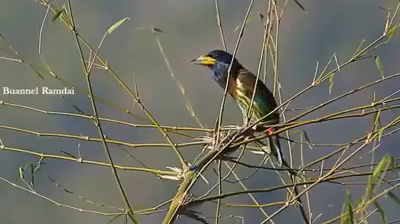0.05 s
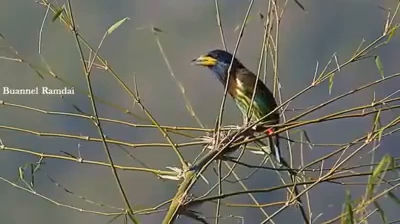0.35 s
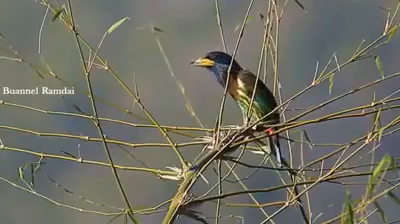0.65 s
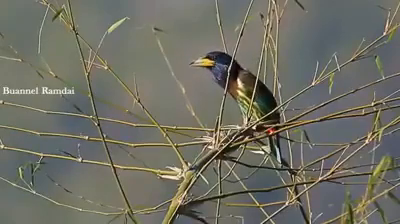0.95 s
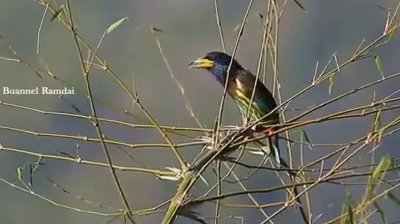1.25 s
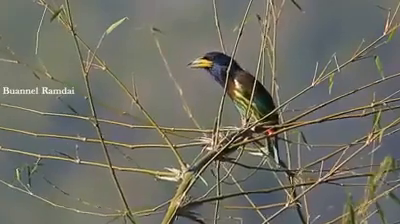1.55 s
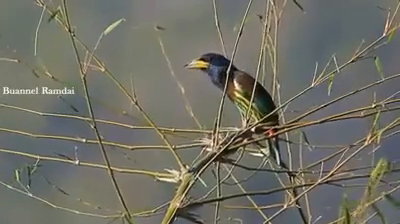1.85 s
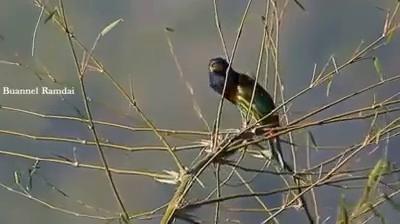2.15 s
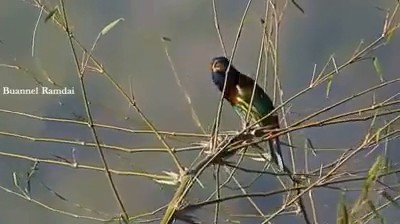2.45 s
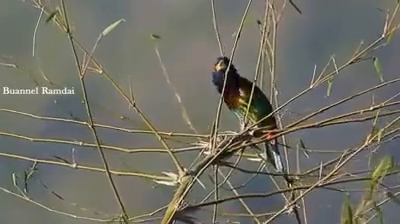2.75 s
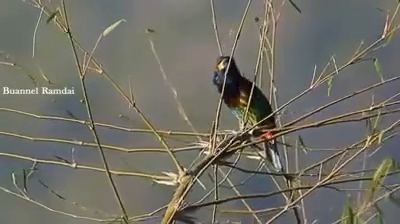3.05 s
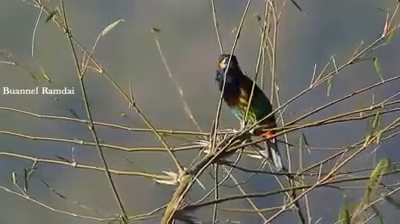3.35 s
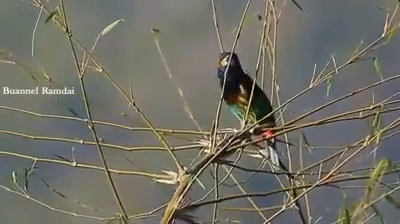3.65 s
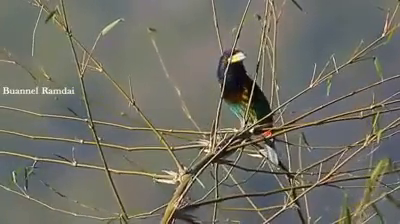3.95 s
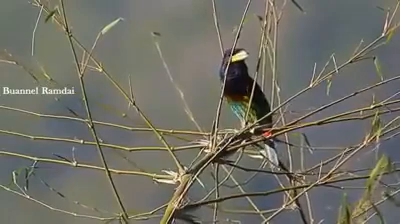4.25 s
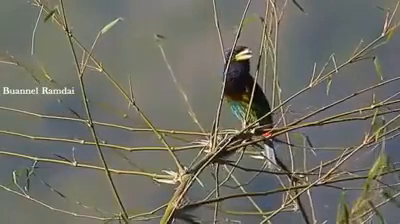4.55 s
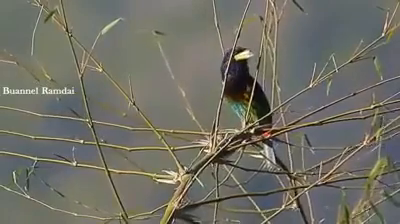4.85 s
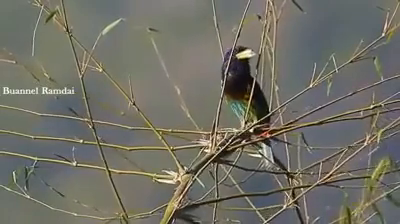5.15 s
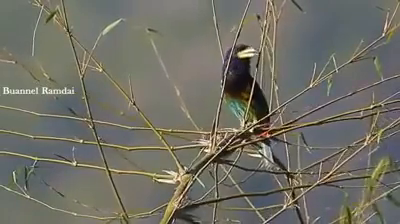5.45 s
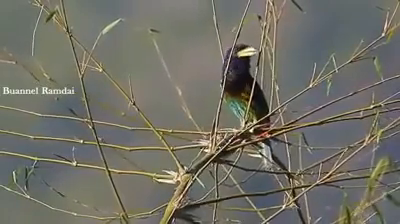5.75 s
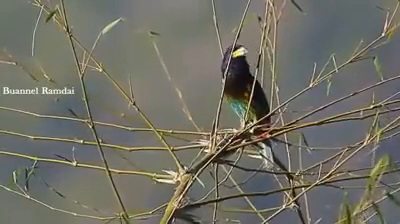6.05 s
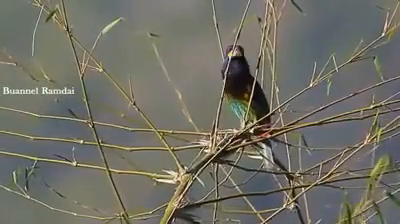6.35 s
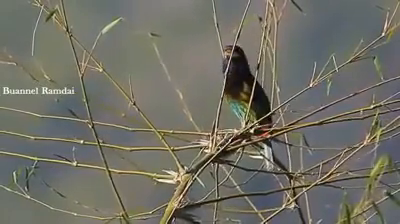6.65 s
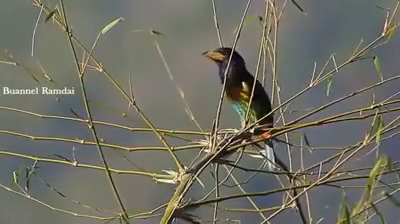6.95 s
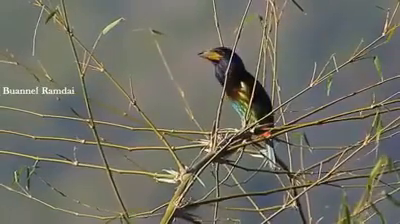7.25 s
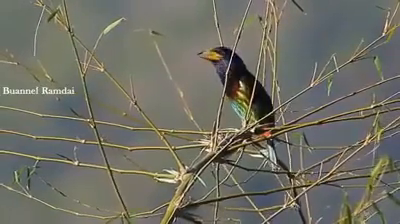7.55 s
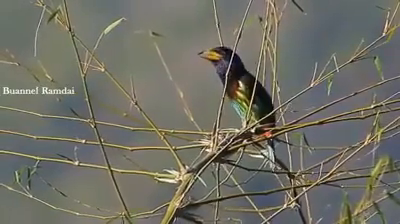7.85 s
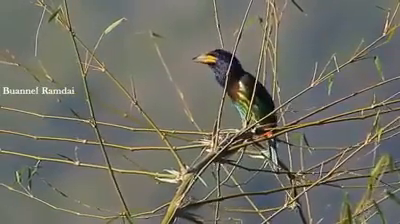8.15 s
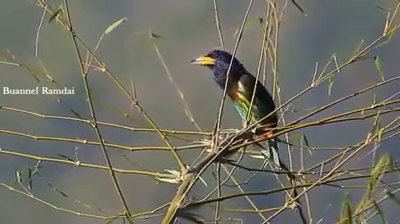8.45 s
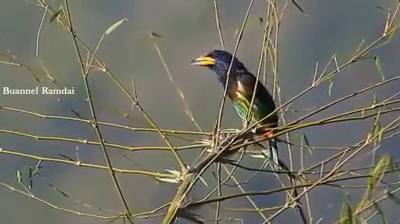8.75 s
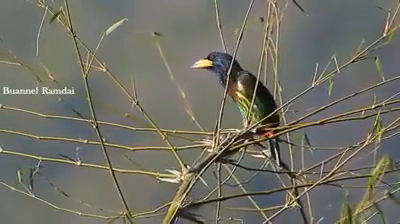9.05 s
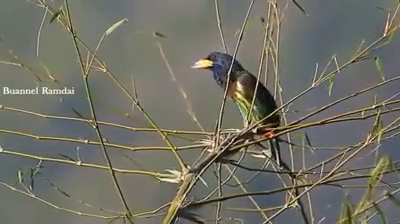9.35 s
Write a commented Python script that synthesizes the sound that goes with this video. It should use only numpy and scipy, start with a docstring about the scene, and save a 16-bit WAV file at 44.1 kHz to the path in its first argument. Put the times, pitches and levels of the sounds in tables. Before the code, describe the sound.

A faint outdoor hush runs throughout, opening on the tail of a bird's call. From about 0.8 seconds this bird calls loudly nine more times, roughly once a second, the last at 9.2 seconds. Each call lasts just over half a second: a sharp arched note breaks into a lower drawl that swells and ends in a falling rasp. A second, much quieter bird answers far off in quick falling triplets, about every three quarters of a second. Thin high whistles accompany the calls near 0.8, 1.9 and 2.9 seconds and return between 6.2 and 7.5. Small birds chirp and buzz faintly, most noticeably around 4, 6, 8 and 9 seconds. One small knock comes at 6.3 seconds with a brief brush of foliage; fainter rustles fall near 5.9 and 8. The wooded slope gives all the calls a soft, duller echo.

```python
"""A great barbet on a bamboo twig calls "kee-aaar" once a second: a loud arched note breaks into a
lower drawl, which ends in a rasp as the syrinx turns rough. Throat and bill colour its overtones.
A second bird answers far off in quick falling triplets, and small birds buzz. Thin whistles sound
along with some of the calls, and the wooded slope scatters all these sounds back as an echo.
There is one small knock, and foliage brushes briefly over a faint outdoor hush."""
import sys
import numpy as np
from scipy import signal
from scipy.fft import rfft, irfft, next_fast_len
from scipy.io import wavfile

SR = 44100
rng = np.random.default_rng(int(sys.argv[2]) if len(sys.argv) > 2 else 0)


def inscribe(sig):
    """Save sig as 16-bit PCM at rate SR to the path in sys.argv[1].

    A 1-D sig is mono; a 2-D sig holds one channel per row.
    Samples are clipped to [-1, 1] before scaling.
    """
    pcm = np.round(np.clip(np.atleast_2d(sig).T, -1, 1) * 32767)
    wavfile.write(sys.argv[1], SR, pcm.astype(np.int16))


N = 422919
TIME = np.arange(N) / SR
DRAWL_S = .45   # from the voice break until the breath starts to give out


def barbet():
    """Source and filter: the syrinx sounds a note that breaks into a drawl, with air through the bill."""
    # The calls. Each row: start, length of the first note and length of the clear drawl in seconds,
    # the first note's top pitch in Hz and level in dB, the drawl's crest pitch in Hz, swell in dB and
    # flutter from 0 to 1, then its overtone gain in dB in the dip, at the crest and in the rasp.
    calls = [(-.285, 0.068, 0.38, 1555, -26, 1309, 8, 0.34, -43, -51, -48),
             (0.768, 0.068, 0.38, 1560, -16.5, 1286, 10, 0.13, -51.5, -50, -49.5),
             (1.845, 0.062, 0.31, 1569, -17, 1278, 8.5, 0.15, -50.5, -49.5, -49),
             (2.882, .068, 0.4, 1561, -16.5, 1295, 10, 0.19, -48.5, -53.5, -49.5),
             (3.935, 0.06, 0.31, 1563, -16, 1306, 9, 0.04, -49, -54, -49),
             (4.979, 0.055, .347, 1568, -16, 1324, 8, 0.11, -49, -52.5, -49),
             (6.019, .064, .328, 1551, -16, 1322, 7, 0.39, -50, -54.5, -48.5),
             (7.063, 0.067, 0.34, 1571, -15.5, 1354, 6, 0.4, -51, -51, -49),
             (8.113, 0.066, 0.33, 1574, -15.5, 1346, 7, 0.35, -52, -49.5, -49),
             (9.169, 0.063, 0.31, 1581, -16, 1346, 6, 0.38, -54, -51, -50.5)]
    # Spectrum of air rushing through the bill. Each row: frequency in Hz, relative density in dB.
    rush_spectrum = [(300, -24), (750, -3.5), (1400, -3), (1750, -10), (2000, 0.5), (2800, -3.5),
                     (3300, -2.5), (4400, -7.5), (4850, -1.5), (5500, 0), (6150, -0.5), (6500, -21.5),
                     (7300, -8.5), (8600, -17.5)]
    out, air = np.zeros(N), coloured_noise(rush_spectrum)
    high_air = butter(air, 4900, "high")
    for start, note_s, clear_s, top_hz, note_db, crest_hz, swell_db, flutter, *overtone_dbs in calls:
        now = (TIME > start) & (TIME < start + .65)
        t, snap = TIME[now], start + note_s
        out[now] += first_note(t, start, snap, top_hz, note_db, high_air[now])
        out[now] += drawl(t, snap, snap + clear_s, crest_hz, swell_db, flutter, overtone_dbs, air[now])
    return out


def first_note(t, start, snap, top_hz, level_db, air, scoop_s=.012, catch_s=.0053):
    """Resonance: the throat favours the second partial of a note that scoops up, swells and snaps off."""
    # The note's partials. Each row: multiple of half the pitch, relative level in dB.
    partials = [(1, -38.5), (2, -2.65), (3, -27.5), (4, -32), (6, -37), (7, -35.5), (8, -46.5), (9, -44.5)]
    age, length = t - start, snap - start
    hz = top_hz * (1 - .3 * np.exp(-age / scoop_s))
    half_phase = phase_of(hz * (1 + .01 * wobble(450, len(t)))) / 2
    catch = from_db(-18.5) * np.exp(-(2 * age / catch_s - 1) ** 2)   # the voice catches, then swells
    swell = catch + np.clip((age - catch_s) / (.68 * length), 0, 1)
    # the upper partials swell less than the main one
    tone = sum(from_db(db) * swell ** (1 if k <= 3 else .5) * np.sin(k * half_phase)
               for k, db in partials)
    squeak_hz = np.interp(age, [0, length], [6900, 5100])
    squeak = wobble(270, len(t)) * np.sin(phase_of(squeak_hz + 200 * wobble(300, len(t))))
    hoarse = from_db(-32.5) * swell ** .29 * air + from_db(-34.5) * np.sqrt(swell) * squeak
    return from_db(level_db) * (tone + hoarse) * gate(t, start, snap + .0027, .0012, .006)


def drawl(t, snap, rasp_start, crest_hz, swell_db, flutter, overtone_dbs, air,
          give_out_s=.045, sag_hz=380, sag_db=29.5):
    """Jitter and shimmer: uneven vibration of the syrinx roughens a tone until the breath gives out."""
    n, age = len(t), np.maximum(t - snap, 0)
    rasp = np.clip((t - rasp_start) / .01, 0, 1)
    pinch = 1 - .5 * np.exp(-((t - rasp_start) / .005 - 1) ** 2)   # the rasp briefly chokes the tone
    hz, level_db, treble_db = drawl_gesture(age, rasp, crest_hz, swell_db, *overtone_dbs)
    spent = np.clip((age - DRAWL_S) / give_out_s, 0, 1)
    pressed = np.clip((age - .18) / .08, 0, 1) * (1 - rasp)   # the swell before the rasp flutters
    jitter = (.007 + .02 * rasp) * wobble(300, n)
    waver = (.0065 + .037 * flutter * pressed) * wobble(60, n)
    phase = phase_of((hz - sag_hz * spent) * (1 + jitter + waver))
    roughness = .13 - .08 * pressed + .35 * rasp   # reedy in the dip, nearly clean on the crest
    shimmer = np.abs(1 + flutter * pressed * wobble(55, n) + roughness * wobble(120, n))
    tone = np.sqrt(2) * from_db(level_db - sag_db * spent) * pinch * shimmer * np.sin(phase)
    treble = from_db(treble_db - 6.8 * spent) * overtones(phase, age, rasp, air)
    return (tone + treble) * gate(t, snap - .005, snap + DRAWL_S + give_out_s + .01, .006, .03)


def drawl_gesture(age, rasp, crest_hz, swell_db, dip_treble_db, crest_treble_db, rasp_treble_db,
                  dip_hz=1214, relax_s=.042):
    """Vocal effort: pitch and level relax, rise to a crest and fall;
    the overtones stay roughly level and brighten in the rasp."""
    tension = np.exp(-age / relax_s)
    effort = np.sin(np.pi / 2 * np.clip((age - .09) / .2, 0, 1)) ** 2
    clear = np.array([dip_hz + 110.45 * tension + (crest_hz - dip_hz) * effort,
                      -39 + .6 * tension + swell_db * effort ** 2.2,
                      dip_treble_db + (crest_treble_db - dip_treble_db) * effort])
    # the rasp jumps onto one falling arc, wherever it sets in
    fall = np.interp(age, [.33, DRAWL_S], [0, 1]) ** 2
    rough = np.array([1402.5 - 163.2 * fall, -34 - 8.5 * fall, rasp_treble_db - 2.5 * fall])
    return (1 - rasp) * clear + rasp * rough


def overtones(phase, age, rasp, air, ring_hz=4740, ring_width_hz=28):
    """Formant filtering: throat resonances colour the drawl's smeared harmonics, heard with rushing air."""
    # Response of the throat and open bill. Each row: frequency in Hz, gain in dB.
    throat = [(1700, 8), (2400, -1), (2700, 4), (3100, -18.5), (3700, -2), (4000, -23), (4500, -15.5),
              (4750, -7), (5100, 0), (5400, 3), (5750, 3), (6100, -4), (6700, -4.5), (7100, -12),
              (8600, -13)]
    n = len(phase)
    reedy = from_db(11 * np.exp(-age / .028))   # strongest just after the voice break
    second = reedy * (1 + .35 * wobble(90, n)) * np.sin(2 * phase + .52 * wobble(130, n))
    # the membranes close a little early or late: the higher the overtone, the wider its band
    upper = np.zeros(n)
    for k in range(3, 7):
        flicker = (1 + .3 * wobble(110, n)) * from_db(2.5 * wobble(12, n))
        upper += flicker * np.sin(k * phase + .057 * k ** 2 * wobble(210, n))
    # period doubling: alternate cycles of the rasp differ, adding partials between the harmonics
    halves = from_db(-4.5) * rasp * sum(wobble(190, n) * np.sin((k + .5) * phase) for k in (1, 4))
    rush = air * (from_db(-12) * (1 - rasp) + from_db(-2) * rasp) * (1 + .49 * wobble(120, n))
    hoarse = np.sqrt(2) * from_db(-4) * coloured(second + upper + halves, throat) + rush
    # one narrow resonance stays put while the pitch moves
    ring = signal.lfilter(*signal.iirpeak(ring_hz, ring_hz / ring_width_hz, fs=SR), hoarse)
    return hoarse + 5.5 * ring


def answering_bird(bill_hz=4520, overtone_db=-15.5):
    """Resonance lifts the overtones of nearly pure falling notes as they slide past the bill's pitch."""
    # The triplets. Each row: start in seconds, level in dB.
    triplets = [(.105, -40.5), (.37, -45), (0.879, -40), (1.654, -39), (1.895, -45.5), (2.39, -39),
                (2.657, -45.5), (3.189, -39.5), (3.983, -39.5), (4.757, -39.5), (5.527, -39),
                (6.297, -37.5), (7.057, -38.5), (7.818, -38), (8.589, -36.5), (9.358, -37)]
    # A soft lead-in hoot and the three notes. Each row: delay and length in seconds,
    # first and last pitch in Hz, relative level in dB.
    notes = [(-.125, 0.054, 835, 790, -21), (0, 0.045, 1270, 745, -9), (0.059, .044, 1183, 760, -7.5),
             (0.119, 0.047, 1204, 855, -6.5)]
    out = np.zeros(N)
    for start, level_db in triplets:
        for delay, length, from_hz, to_hz, db in notes:
            now = (TIME > start + delay) & (TIME < start + delay + length)
            progress = (TIME[now] - start - delay) / length
            glide_hz = from_hz + (to_hz - from_hz) * progress ** .87
            hz = glide_hz * (1 + .013 * wobble(90, len(progress)))
            phase = phase_of(hz)
            bill = sum(np.exp(-((k * hz - bill_hz) / 330) ** 2) * np.sin(k * phase) for k in (4, 5))
            tone = np.sin(phase) + from_db(overtone_db) * bill
            out[now] += from_db(level_db + db) * np.sin(np.pi * progress) * tone
    return out


def small_birds(flutter_db=2.5):
    """Random modulation spreads each far whistle or buzz into a narrow sliding band."""
    # The songs. Each row: middle and length in seconds, first and last pitch in Hz,
    # relative level in dB, half-width of the band in Hz.
    songs = [(0.403, 0.1, 2920, 3080, -61, 110), (0.58, 0.053, 3120, 3300, -62, 97),
             (1.043, 0.2, 750, 720, -57, 16), (1.508, 0.064, 2880, 2720, -60, 18),
             (1.56, 0.1, 2440, 2382, -66.5, 31), (2.501, 0.052, 3370, 2414, -63, 40),
             (2.58, 0.049, 2440, 3670, -68, 43), (2.716, 0.11, 2500, 2377, -64.5, 11),
             (2.764, 0.058, 2910, 2650, -65, 52), (3.699, 0.068, 2550, 3540, -66, 82),
             (3.892, 0.079, 3190, 2610, -60, 52), (4.08, .13, 4480, 4320, -45.5, 150),
             (4.61, 0.084, 2400, 3500, -62.5, 180), (6.051, 0.29, 4550, 4540, -48.5, 280),
             (6.777, 0.24, 2790, 3030, -62, 250), (7.814, 0.096, 2690, 3290, -58, 110),
             (7.903, 0.3, 4670, 4190, -54, 290), (7.968, 0.1, 4580, 4200, -51, 86),
             (8.885, .09, 2810, 2870, -61, 20), (9.016, 0.28, 4690, 4410, -53, 360)]
    out = np.zeros(N)
    for middle, length, from_hz, to_hz, db, spread_hz in songs:
        now = np.abs(TIME - middle) < length / 2
        n = now.sum()
        progress = np.linspace(0, 1, n)
        phase = phase_of(from_hz + (to_hz - from_hz) * progress)
        band = wobble(spread_hz, n) * np.sin(phase) + wobble(spread_hz, n) * np.cos(phase)
        buzz = rms_one(band * from_db(flutter_db * wobble(33, n)))
        out[now] += from_db(db) * np.sin(np.pi * progress) ** 2 * buzz
    return out


def whistles(waver_db=1.0):
    """Amplitude modulation: thin pure tones of steady pitch swell in and waver a little."""
    # The whistles. Each row: start and end in seconds, pitch in Hz, level in dB.
    notes = [(0.795, 0.892, 4990, -44), (1.858, 1.914, 5330, -37), (1.878, 1.954, 4645, -36.5),
             (2.905, 2.995, 3970, -44.5), (2.907, 2.993, 4660, -42.5), (2.97, 3.06, 4650, -41),
             (6.23, 6.428, 3962, -46.5), (7.07, 7.214, 3960, -47), (7.064, 7.176, 5300, -46.5),
             (7.22, 7.482, 3954, -48.5)]
    tones = np.zeros(N)
    for start, end, hz, db in notes:
        swell = gate(TIME, start - .008, end + .0025, .058, .018)
        tones += from_db(db) * swell * np.sin(2 * np.pi * hz * TIME)
    return tones * from_db(waver_db * wobble(22, N))


def knock():
    """Damped free vibration: a blow on something light excites quickly dying modes and no bass."""
    # The blow. Each row: time in seconds, level in dB.
    blows = [(6.257, -26.5)]
    # The modes. Each row: frequency in Hz, relative level in dB, time to fall by 60 dB in seconds.
    modes = [(700, -11, 0.044), (880, 2.5, 0.019), (3480, -11, 0.02)]
    out = np.zeros(N)
    for start, level_db in blows:
        now = (TIME > start) & (TIME < start + .1)
        age = TIME[now] - start
        for hz, db, t60 in modes:
            out[now] += from_db(level_db + db - 60 * age / t60) * np.sin(2 * np.pi * hz * age)
    return butter(out + 1e-18, 560, "high", order=2)


def slope_echo(x, echo_db=-15.5, dull_hz=6000):
    """Diffuse scattering: countless leaves and trunks return the sound weaker and duller."""
    # Envelope of the slope's echo. Each row: delay in seconds, relative level in dB.
    envelope = [(.004, -14.5), (.02, 6), (.07, 0.5), (.13, -7.5), (.22, -15.5), (.32, -8), (.40, -13.5),
                (.6, -24.5)]
    delay = np.arange(int(.6 * SR)) / SR
    scatter = rng.standard_normal(len(delay)) * gain_along(envelope, delay) * (delay > .004)
    response = butter(scatter / np.linalg.norm(scatter), dull_hz, "low", order=1)
    return from_db(echo_db) * signal.fftconvolve(x, response)[:N]


def rustles(grain_db=3.5):
    """Friction noise: foliage brushes in short soft swells of grainy hiss."""
    # The brushes. Each row: middle and length in seconds, level in dB.
    brushes = [(5.946, 0.099, -57), (6.252, 0.14, -49), (8.05, 0.18, -60)]
    swell = sum(from_db(db) * np.cos(np.pi * np.clip((TIME - middle) / length, -.5, .5))
                for middle, length, db in brushes)
    hiss = butter(rng.standard_normal(N), [2000, 8000], "band")
    return swell * rms_one(hiss * from_db(grain_db * wobble(200, N)))


def hush(split_hz=2000, hiss_db=-60):
    """Broadband noise of air and far foliage: a low murmur swells slowly under a steady high hiss."""
    # Spectrum of the hush. Each row: frequency in Hz, relative density in dB.
    spectrum = [(25, -28.5), (55, -10), (110, -4), (220, -2), (450, -1), (700, -2.5), (1100, 0), (1600, -5),
                (2700, -3), (3400, -5), (3900, -10.5), (6000, -12), (8600, -15.5)]
    # Course of the murmur. Each row: time in seconds, level between 100 and 650 Hz in dB.
    murmur_levels = [(0.0, -64.5), (0.32, -67), (0.99, -61), (1.25, -66), (4.38, -67.5), (4.91, -64.5),
                     (6.84, -66.5), (7.27, -63.5), (9.13, -67.5), (9.59, -67)]
    noise = coloured_noise(spectrum)
    murmur = butter(noise, split_hz, "low") / np.std(butter(noise, [100, 650], "band"))
    hiss = rms_one(butter(coloured_noise(spectrum), split_hz, "high"))
    return gain_along(murmur_levels, TIME) * murmur + from_db(hiss_db) * hiss


def from_db(db):
    """Amplitude ratio of a level in decibels."""
    return 10 ** (np.asarray(db) / 20)


def rms_one(x):
    """Normalisation to unit rms."""
    return x / np.sqrt(np.mean(x ** 2) + 1e-20)


def gain_along(levels, t):
    """Gain at times t, interpolated between rows of seconds and dB."""
    return from_db(np.interp(t, *np.transpose(levels)))


def coloured(x, spectrum):
    """Spectral shaping by rows of Hz and dB, joined on a log-frequency axis."""
    size = next_fast_len(len(x) + 2048)
    log_hz = np.log(np.maximum(np.fft.rfftfreq(size, 1 / SR), 1))
    hz, db = np.transpose(spectrum)
    gain = from_db(np.interp(log_hz, np.log(hz), db))
    return irfft(rfft(x, size) * gain, size)[:len(x)]


def coloured_noise(spectrum):
    """White noise shaped to a spectrum, at unit rms."""
    return rms_one(coloured(rng.standard_normal(N), spectrum))


def butter(x, hz, kind, order=4):
    """A filter with a maximally flat passband."""
    return signal.sosfilt(signal.butter(order, hz, kind, fs=SR, output="sos"), x)


def wobble(rate_hz, size):
    """Random fluctuation, band-limited to rate_hz, of about unit rms."""
    run_in = SR // 5
    return rms_one(butter(rng.standard_normal(size + run_in), rate_hz, "low"))[run_in:]


def gate(t, start, end, rise, fall):
    """An envelope with linear attack and release."""
    return np.clip((t - start) / rise, 0, 1) * np.clip((end - t) / fall, 0, 1)


def phase_of(hz):
    """Phase as the running integral of frequency."""
    return 2 * np.pi * np.cumsum(hz) / SR


def scene(songs_db=2.5, far_echo_db=5.5):
    """Superposition at one microphone; the far birds carry a larger share of echo."""
    near = barbet() + whistles()
    far = answering_bird() + from_db(songs_db) * small_birds()
    echo = slope_echo(near + from_db(far_echo_db) * far)
    return (near + far + echo + knock() + rustles() + hush())[None]


def record(dry, cutoff_hz=8700):
    """Band limiting: a steep low-pass filter removes the top of the treble."""
    return signal.sosfilt(signal.ellip(12, .1, 80, cutoff_hz, fs=SR, output="sos"), dry)


dry = scene()
out = record(dry)
inscribe(out)
```